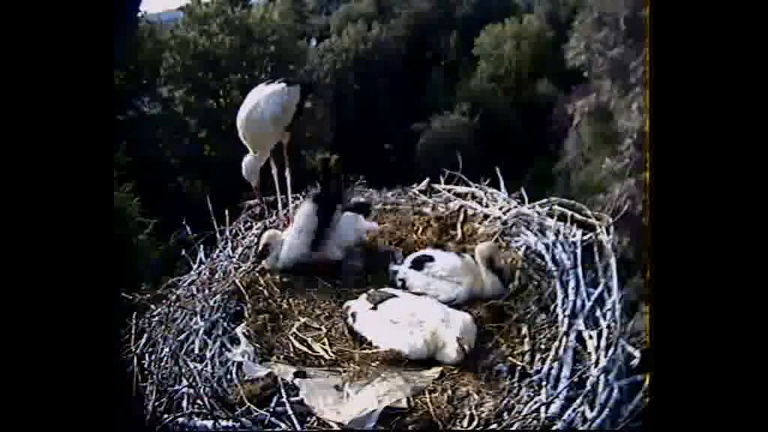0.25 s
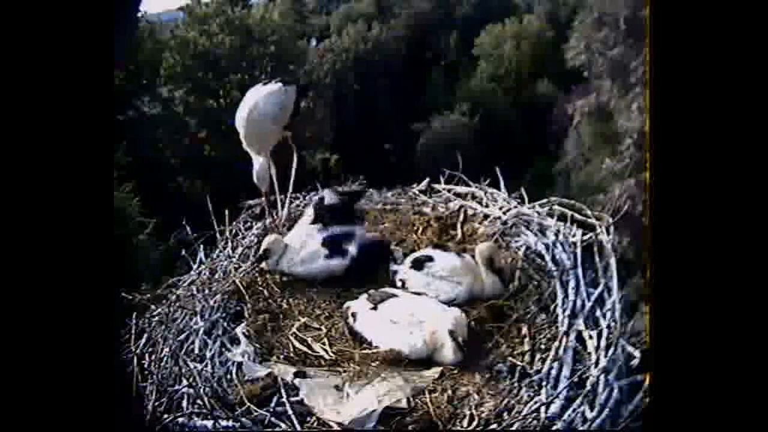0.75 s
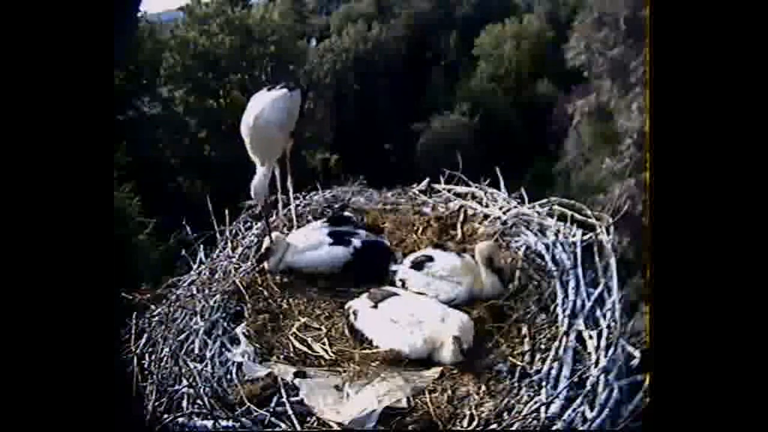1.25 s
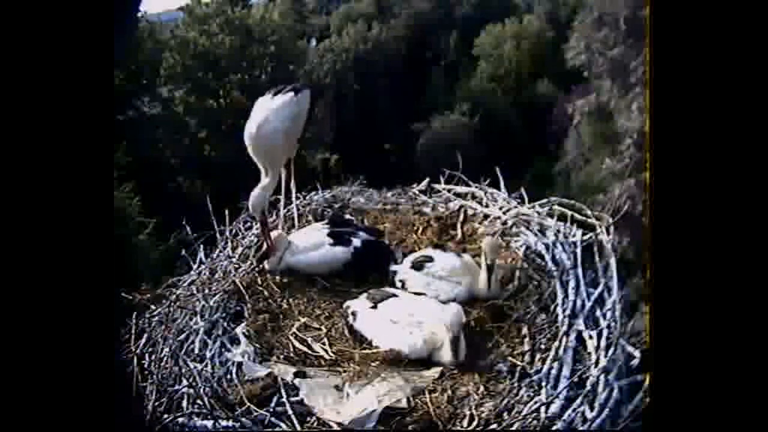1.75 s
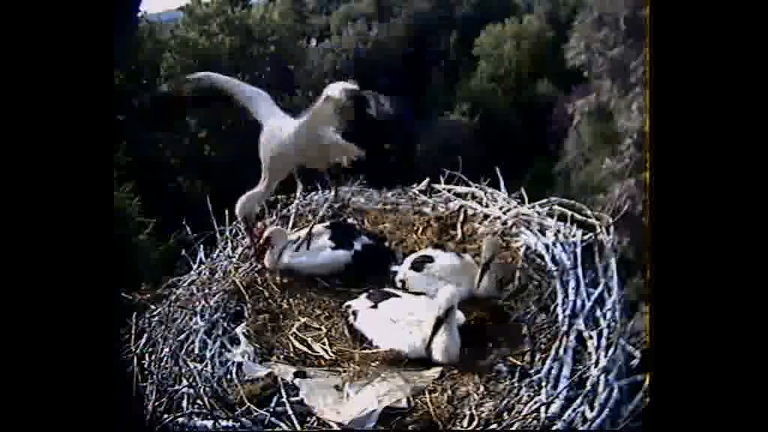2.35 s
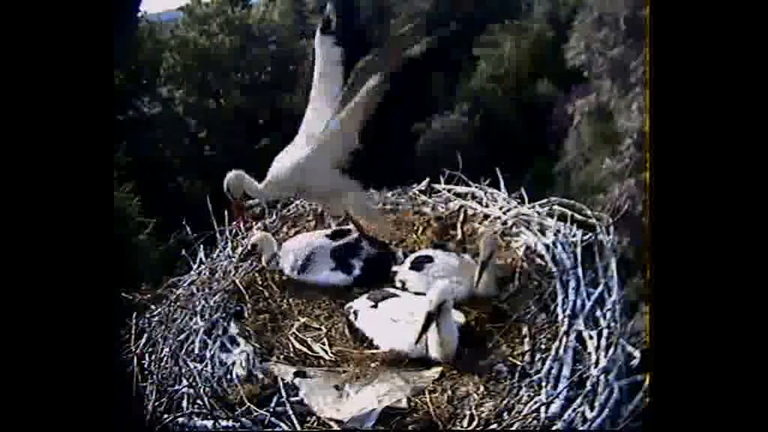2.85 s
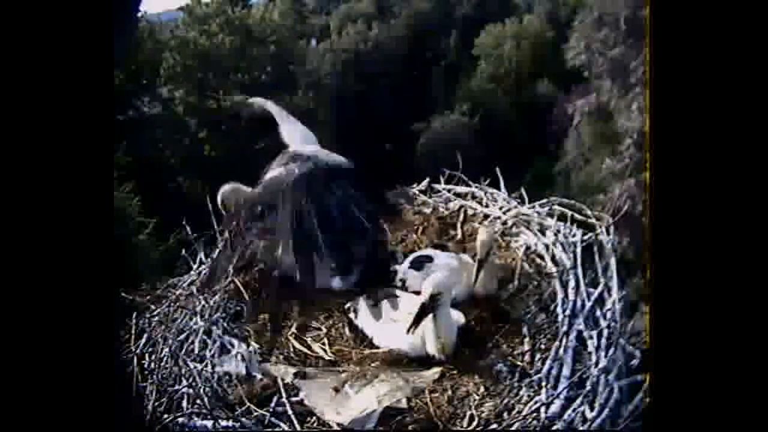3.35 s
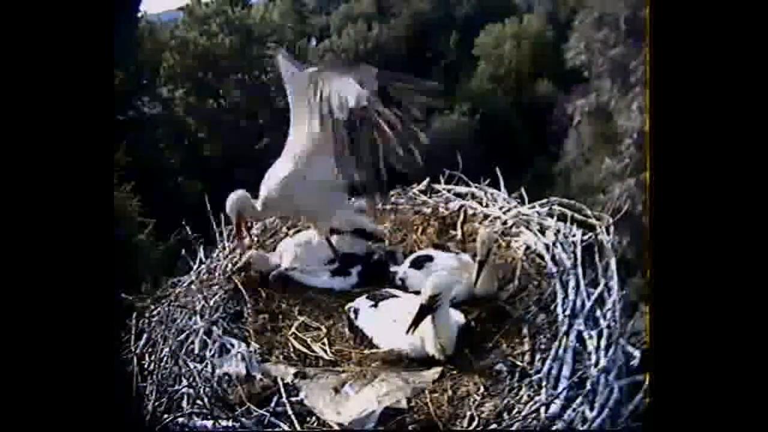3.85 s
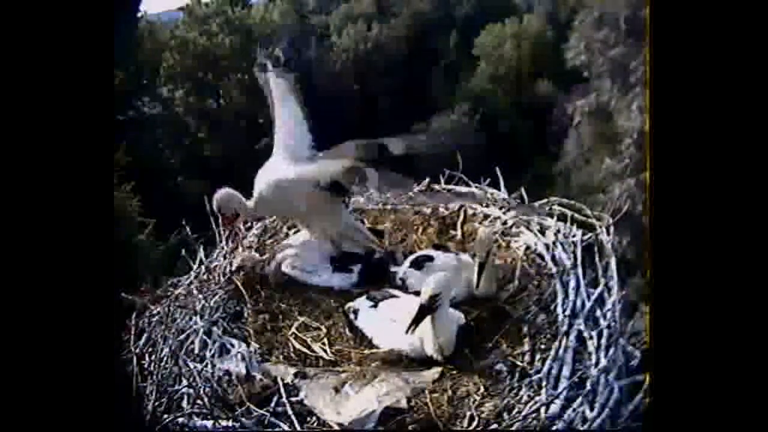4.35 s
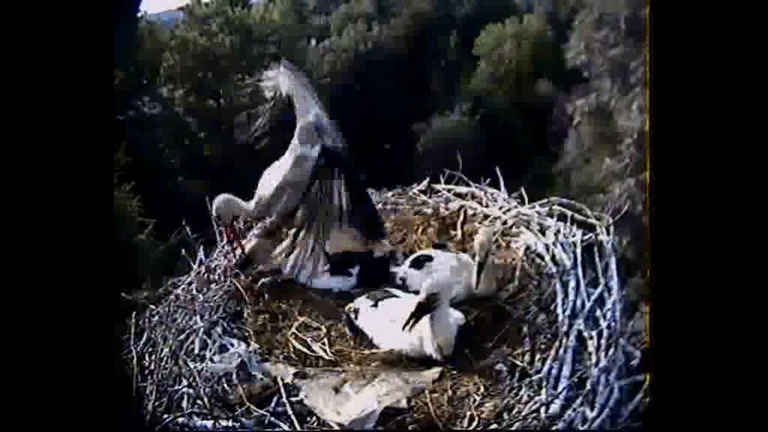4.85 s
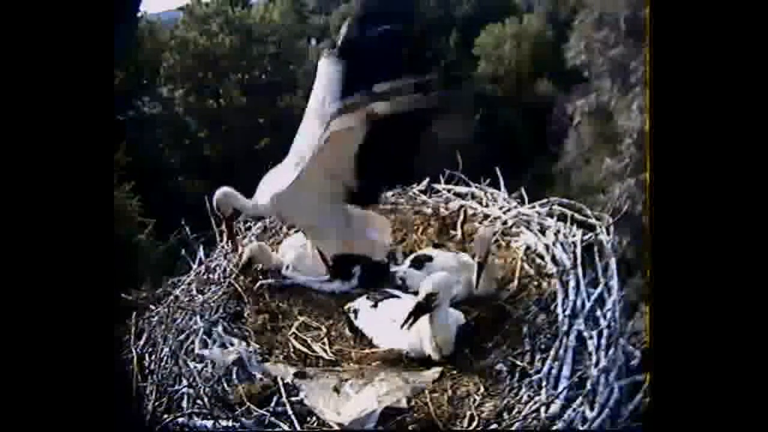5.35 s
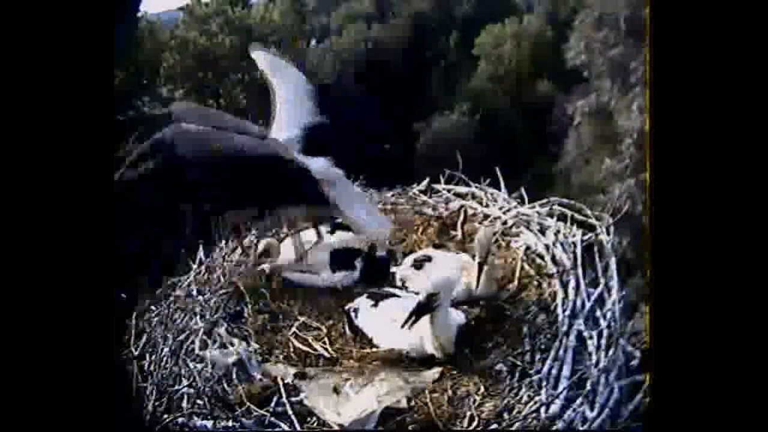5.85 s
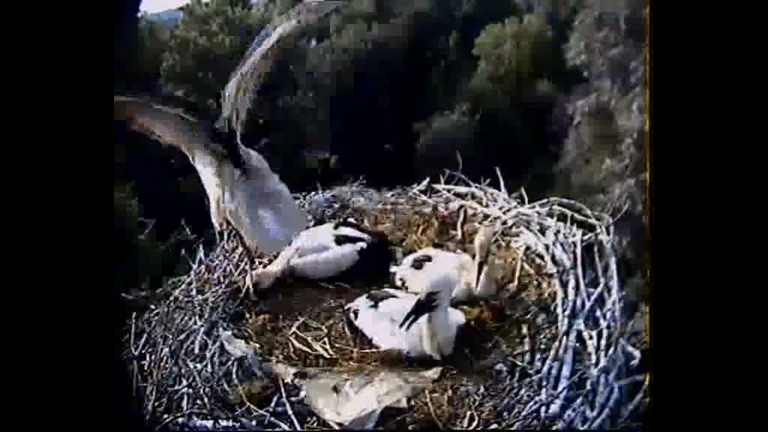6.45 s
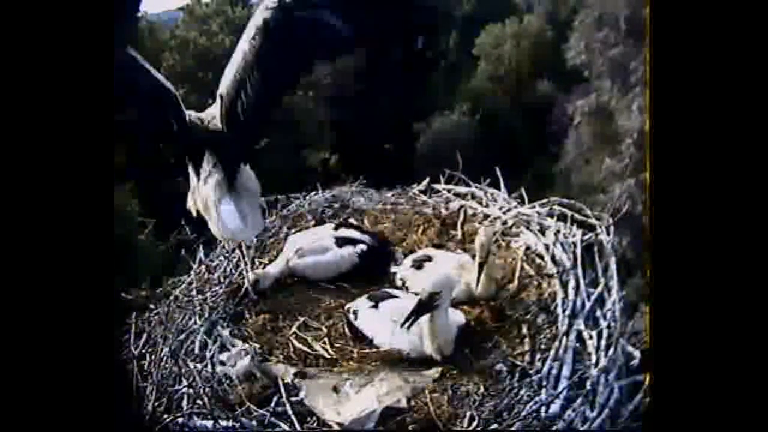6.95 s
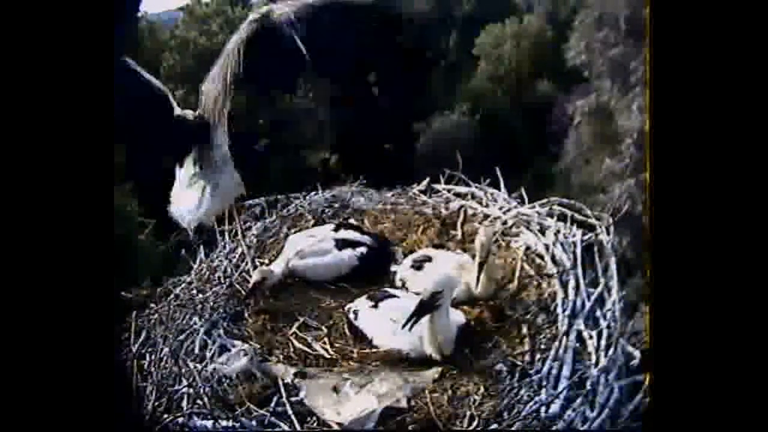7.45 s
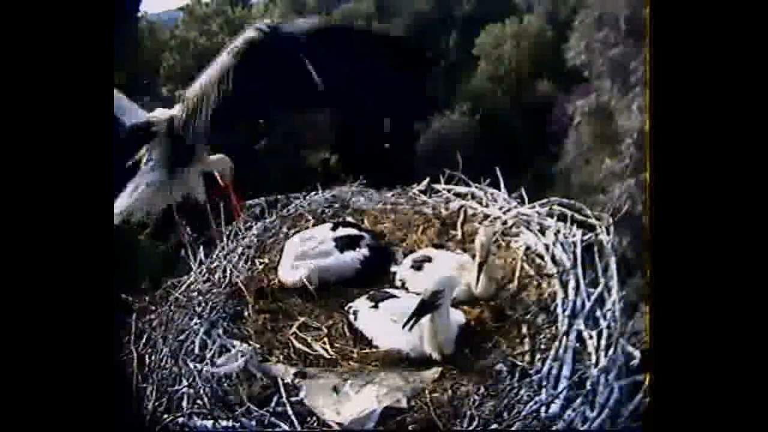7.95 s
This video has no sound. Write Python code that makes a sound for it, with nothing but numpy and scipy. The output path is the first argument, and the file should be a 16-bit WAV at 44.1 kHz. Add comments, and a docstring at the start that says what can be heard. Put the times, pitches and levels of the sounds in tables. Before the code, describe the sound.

Thin bird whistles give way to strong, rhythmic wing swishes with feather whistles and dry cracks, one very loud, above a low outdoor rumble.

```python
"""A young bird beats its wings in a nest among trees: noise arched in pitch swishes, feather tones whistle.
In the first seconds a stork chick whistles and mews, a gliding tone, among the first weak strokes.
Twigs snap and the wing cracks as short rings and noise bursts; straw ticks; soft puffs are shaped noise.
Shaped noise and a rough drone make distant traffic, wind and leaves; a narrow-band nest camera hears all."""
import sys
import numpy as np
from scipy import signal
from scipy.fft import rfft, irfft, next_fast_len
from scipy.io import wavfile
from scipy.ndimage import uniform_filter1d, map_coordinates

SR = 44100
rng = np.random.default_rng(int(sys.argv[2]) if len(sys.argv) > 2 else 0)


def dump_mix(stems):
    """Bounce the given channels to the path in sys.argv[1] as a 16-bit WAV at rate SR."""
    frames = np.atleast_2d(stems).T  # one column per channel
    limited = np.clip(frames, -1, 1)  # hard clip at full scale
    pcm = np.round(limited * 32767).astype(np.int16)
    wavfile.write(sys.argv[1], SR, pcm)


N = 361619
T = np.arange(N) / SR  # s


def amp(db):
    """Decibels to a linear factor."""
    return 10 ** (np.asarray(db) / 20)


def unit(x):
    """x scaled to rms 1."""
    return x / np.sqrt(np.mean(np.abs(x) ** 2) + 1e-20)


def along(points, hz):
    """(Hz, value) points read on a log frequency axis."""
    f, v = np.transpose(points)
    return np.interp(np.log(hz + 1), np.log(f + 1), v)


def curves(rows, t=T):
    """Each column after the first, interpolated at t."""
    s, *cols = np.transpose(rows)
    return [np.interp(t, s, c) for c in cols]


def around(start, end):
    """The samples from start to end, with a 20 ms margin."""
    return slice(round((start - .02) * SR), round((end + .02) * SR))


def window(start, end, t, fade):
    """1 from start to end, with linear fades outside both."""
    return np.clip((t - start) / fade + 1, 0, 1) * np.clip((end - t) / fade + 1, 0, 1)


def wobble(rate, size=N):
    """A smooth random curve, rate knots a second."""
    knots = rng.standard_normal(int(size * rate / SR) + 4)
    return map_coordinates(knots, [np.arange(size) * rate / SR])


def smoothed(field, bins, frames):
    """A spectrogram-shaped field averaged over bins and frames."""
    return uniform_filter1d(uniform_filter1d(field, size=bins, axis=0), size=frames, axis=1)


def filtered(x, response):
    """x times a response of frequency."""
    m = next_fast_len(len(x) + 8192)
    return irfft(rfft(x, m) * response(np.fft.rfftfreq(m, 1 / SR)), m)[:len(x)]


def tone(pitch, rough, spread):
    """A phasor whose size and phase are partly scattered by noise."""
    rough = np.clip(rough, 0, 1)
    scatter = wobble(spread, size=len(pitch)) + 1j * wobble(spread, size=len(pitch))
    carrier = np.exp(2j * np.pi * np.cumsum(pitch) / SR)
    return carrier * (np.sqrt(1 - rough) + np.sqrt(rough / 2) * scatter)


def hump(hz, centre, sharp):
    """A resonance round a centre, its mean power over the bins set to 1."""
    shape = 1 / (1 + (sharp * (hz / centre - centre / hz)) ** 2)
    return shape / np.sqrt(np.mean(shape ** 2, axis=0))


def rush(spectrum, patchy_db):
    """Coloured noise of rms 1 with patches of random gain."""
    z = signal.stft(rng.standard_normal(N), nperseg=512)[2]
    patches = unit(smoothed(rng.standard_normal(z.shape), bins=8, frames=8))
    noise = signal.istft(z * amp(patchy_db * patches), nperseg=512)[1][:N]
    return unit(filtered(noise, lambda hz: amp(along(spectrum, hz))))


# Spectrum of leaves and straw. Each row: frequency in Hz, relative density in dB.
RUSTLE_SPECTRUM = [(1290, -7.5), (2200, -8), (3300, -2), (3850, -3.5), (5570, -4), (7600, -6), (9750, -7),
                   (12700, 5.5), (21400, -120)]


def crackle(rate):
    """Faint dry ticks of straw: random impulses, rate a second, sizes widely spread."""
    hits = rng.random(N) < rate / SR
    sizes = amp(7 * rng.exponential(size=N).clip(0, 3))
    ticks = hits * sizes * rng.choice([-1, 1], N)
    return filtered(ticks, lambda hz: amp(along(RUSTLE_SPECTRUM, hz)))


# Background course. Each row: time in seconds, rumble level in dB, hum level in dB, rustle level in dB.
AIR_LEVELS = [(0, -56, -54.5, -62.5), (.48, -56, -54.5, -57.5), (1, -55.5, -54, -62),
              (2, -53, -53.5, -59.5), (2.69, -56, -52.5, -54.5), (4.06, -50.5, -54, -56),
              (4.68, -53, -50.5, -53.5), (5.21, -50, -52.5, -56), (5.96, -46.5, -50, -51),
              (6.69, -54, -51, -60.5), (8.2, -53, -52.5, -59.5)]
# Far engine. Each row: time in seconds, pitch in Hz, level in dB.
ENGINE_DRONE = [(0, 102, -61), (1.2, 102, -58), (4.3, 98, -53), (5.1, 90, -61), (5.3, 70, -58),
                (6.8, 68, -50), (8.2, 67, -58)]
# Far rumble. Each row: frequency in Hz, relative density in dB.
RUMBLE_SPECTRUM = [(8.8, -54), (15, -7.5), (59, 3), (200, -21.5), (260, -65), (440, -120)]
# Hum of traffic and wind. Each row: frequency in Hz, relative density in dB.
HUM_SPECTRUM = [(76, -13), (130, 4.5), (172, -1), (238, 2), (328, -2.5), (452, -3), (568, -6.5), (884, -5),
                (1170, -5), (1320, -7.5), (1820, -10), (2510, -16), (3200, -25), (4160, -62), (7040, -120)]


def air():
    """Far rumble and hum as shaped noise, a rough engine drone; leaves and straw rustle above them."""
    rumble_db, hum_db, rustle_db = curves(AIR_LEVELS)
    drone_hz, drone_db = curves(ENGINE_DRONE)
    rumble = amp(rumble_db) * rush(RUMBLE_SPECTRUM, patchy_db=0.0)
    drone = amp(drone_db) * tone(drone_hz, 0.7, spread=16).real
    hum = amp(hum_db) * rush(HUM_SPECTRUM, patchy_db=.6)
    leaves = rush(RUSTLE_SPECTRUM, patchy_db=.5) + 1.6 * crackle(rate=50)
    return rumble + drone + hum + amp(rustle_db + 0.55 * wobble(14)) * leaves


# Twig snaps, and cracks of the wing as a stroke starts. Each row: start in seconds, level in dB,
# pitch in Hz, then thud and crack in dB re that level.
SNAP_EVENTS = [(0.0622, -38.5, 1720, -1, -34), (0.2785, -47, 2920, -16, -20), (2.3324, -29, 3470, -23, -20),
               (2.5158, -20.5, 3230, -25, -45), (2.9017, -22.5, 4250, -34, -41),
               (3.0608, -29.5, 2460, -25, -4.5), (3.1768, -22, 1570, -37, -12),
               (3.2696, -24.5, 2250, -33, -36), (3.296, -39, 1920, -27, -2), (3.6144, -31, 1430, -31, -14),
               (3.7053, -32, 1560, -18, -9), (4.1434, -36, 3660, 3.5, -21), (4.4634, -16, 2130, -47, -26),
               (4.508, -31, 3380, -12, -16), (4.8427, -25, 2840, -31, -26), (5.22, -31.5, 1520, -26, -4),
               (5.8885, -20, 1500, -20, -25), (5.8914, -8, 3030, -10.5, -9), (8.093, -26.5, 1880, -12, -30)]
# Thin straw ticks. Each row: start in seconds, level in dB, pitch in Hz.
STRAW_TICKS = [(0.5205, -40.5, 4040), (0.5694, -38.5, 4500), (4.12, -41, 6240), (4.351, -41, 5800),
               (7.4195, -47, 7800), (7.596, -44.5, 8610), (7.6315, -43, 7100), (7.7794, -42, 7100),
               (7.873, -46, 7710), (7.9468, -47.5, 7750), (8.0366, -50.5, 4410)]


def snaps_and_ticks():
    """Twig snaps and wing cracks: a brief ring, a noise burst, a low thud, a bright crack; ticks are noise."""
    out, t = np.zeros(N + SR), np.arange(SR // 20) / SR
    for s, db, hz, thud_db, crack_db in SNAP_EVENTS:
        noise = rng.standard_normal((2, len(t)))
        ring = -amp(-60 * t / .0035) * np.sin(2 * np.pi * hz * t)
        burst = filtered(noise[0], lambda f: (f > 600) / (1 + (f / 4000) ** 2))
        burst = .5 * amp(-60 * t / .018) * burst
        thud = -(np.sin(2 * np.pi * 430 * t) + 0.39 * np.sin(2 * np.pi * 760 * t))
        thud = amp(thud_db - 60 * t / 0.014) * thud
        crack = amp(crack_db - 60 * t / 0.0088) * filtered(noise[1], lambda f: f > 4800)
        out[round(s * SR):][:len(t)] += amp(db) * (ring + burst + thud + crack)
    for s, db, hz in STRAW_TICKS:
        tick = filtered(rng.standard_normal(len(t)), lambda f: hump(f + 1, hz, sharp=1.7))
        out[round(s * SR):][:len(t)] += amp(db - 60 * t / 0.0092) * tick
    return out[:N]


# Chick calls, one list per call. Each row: time in seconds, pitch in Hz, level in dB.
CHICK_CALLS = [
    [(0.065, 1750, -54), (0.1, 2040, -46), (0.135, 3480, -63), (0.155, 3130, -56), (0.2, 2870, -61),
     (0.25, 2980, -49), (0.28, 2920, -45.5), (0.315, 2670, -51), (0.35, 2410, -52), (0.43, 2230, -45),
     (0.462, 2445, -64), (0.5, 2083, -40), (0.55, 1852, -53), (0.585, 2090, -41.5), (0.62, 1866, -48),
     (0.655, 1707, -55), (0.675, 1842, -51), (0.705, 1758, -49.5), (0.745, 1618, -55)],
    [(1.5, 1695, -52.5), (1.522, 2150, -58), (1.532, 2640, -45), (1.58, 3200, -46), (1.62, 3354, -40),
     (1.65, 3213, -42), (1.662, 3010, -43), (1.7, 2810, -40.5), (1.75, 2752, -37.5), (1.785, 2520, -39.5),
     (1.802, 2210, -44), (1.85, 2320, -45.5), (1.885, 2460, -52.5), (1.945, 2020, -64)],
    [(1.955, 1924, -47), (2.0, 1888, -39.5), (2.03, 1910, -41.5), (2.055, 2155, -39.5), (2.085, 1874, -39),
     (2.2, 1860, -36.5), (2.3, 1826, -38), (2.33, 1740, -46)],
]
# Hoarse moments. Each row: start in seconds, end in seconds, added share of scatter (0-1).
HOARSE = [(.05, .165, .35), (.66, .76, 0.14), (1.805, 1.877, .6), (1.95, 2.34, 0.04)]
# Mewing moments. Each row: start in seconds, end in seconds, level in dB of the lines at thirds.
MEW_SPELLS = [(0.664, .735, -53), (1.955, 2.03, -53.5), (2.09, 2.35, -51.5)]
# Mew lines. Each row: multiple of a third of the pitch, level in dB re the mew level.
MEW_LINES = [(1, -3), (2, 0), (4, -5), (5, -9), (7, -15), (8, -20), (9, -17), (10, -23)]
# Voice overtone. Each row: pitch in Hz, overtone in dB re the voice.
VOICE_OVERTONE = [(1850, -35), (2100, -15.5), (2500, -20.5), (3300, -16)]
BREATHY_SHARE = .045  # scatter in a clear voice
MEW_FADE_S, HOARSE_FADE_S = 0.022, .02


def chick():
    """A near-pure whistle with one overtone; in the mews, lines appear at thirds of the pitch."""
    out = np.zeros(N)
    hoarse = BREATHY_SHARE + sum(share * window(a, b, T, HOARSE_FADE_S) for a, b, share in HOARSE)
    mewing = sum(amp(db) * window(a, b, T, MEW_FADE_S) ** 2 for a, b, db in MEW_SPELLS)
    for rows in CHICK_CALLS:
        start, end = rows[0][0], rows[-1][0]
        span = around(start, end)
        pitch, level_db = curves(rows, T[span])
        pitch = uniform_filter1d(pitch, size=300)
        pitch = pitch * (1 + 0.00627 * wobble(50.26, size=len(pitch)))
        rough = hoarse[span]
        overtone = amp(along(VOICE_OVERTONE, pitch)) * tone(2 * pitch, rough, spread=460)
        voice = tone(pitch, rough, spread=600) + overtone
        # higher lines are rougher
        mew = sum(amp(db) * tone(k * pitch / 3, .07 * k + .15, spread=250) for k, db in MEW_LINES)
        call = (amp(level_db) * voice + mewing[span] * mew).real
        out[span] += np.sqrt(2) * window(start, end, T[span], 0.011) * call
    return out


# Soft noise puffs: straw, feathers, wing puffs and the chick's hissing breath. Each row: start in seconds,
# length in seconds, centre in Hz, level in dB.
SOFT_PUFFS = [(0.365, 0.15, 7000, -58.5), (0.716, 0.1, 1955, -57), (1.101, 0.081, 517, -49.5),
              (1.64, 0.096, 550, -48.5), (1.785, 0.1, 5860, -60.5), (1.95, 0.67, 3000, -56),
              (2.326, 0.13, 2320, -50), (2.336, 0.39, 1070, -48), (4.034, 0.091, 6700, -54),
              (5.881, 0.054, 3060, -42), (6.056, 0.12, 5000, -55), (7.227, 0.09, 6500, -62),
              (7.585, 0.12, 7500, -60.5)]


def soft_puffs():
    """Straw, feathers, wing puffs and the chick's hissing breath: broad noise, fast swell and slow fade."""
    hz, t, z = signal.stft(rng.standard_normal(N), SR, nperseg=256)
    gain = np.zeros(z.shape)
    for s, length, centre_hz, db in SOFT_PUFFS:
        phase = np.clip((t - s) / length, 0, 1)
        swell = np.sin(np.pi * phase ** 0.47)  # early peak
        gain += amp(db) * hump(hz[:, None] + 1, centre_hz, sharp=0.98) * swell
    return signal.istft(z * gain, SR, nperseg=256)[1][:N]


# Wing strokes. Each row: start in seconds, length in seconds, top of the arch in Hz, then base levels
# of arch, closing puff and hiss in dB.
WING_STROKES = [(1.025, 0.11, 3300, -65, -62, -74), (1.568, 0.13, 2620, -63, -60, -68),
                (2.014, .13, 3070, -55, -53, -65), (2.826, .15, 3380, -57.5, -46, -54),
                (3.291, 0.12, 3520, -51.5, -45.5, -53), (3.702, 0.12, 3620, -51.5, -46.5, -53),
                (4.143, 0.11, 3660, -51, -48, -52.5), (4.508, .12, 3850, -48, -49.5, -54.5),
                (4.91, 0.13, 3650, -45.5, -45.5, -68), (5.27, 0.12, 3200, -40, -43, -50),
                (5.642, 0.14, 3200, -40, -45, -55), (5.93, 0.12, 3270, -39.5, -46.5, -41),
                (6.298, 0.113, 3767, -43.5, -47, -39), (8.089, 0.11, 3550, -47.5, -47, -47)]
# Course of a stroke. Each row: share of its length, air speed as share of the top, then arch, puff and
# hiss in dB re the base levels.
STROKE_COURSE = [(0, 0.28, 2, -13, -8), (.1, 0.71, -1.5, -7, -6), (.2, 0.93, 1, -7, 0),
                 (.45, 0.87, -3.5, -15, 2), (.62, 0.88, 1.5, -2, 4.5), (.72, .55, -7, 2, 2.5),
                 (.85, 0.36, -13, 1, -2), (1, 0.069, -15, -6, -19)]
# Feather resonances. Each row: centre in Hz, width in Hz, relative level in dB.
VANE_RESONANCES = [(513, 190, -1.5), (750, 90, 2), (1536, 410, -1), (2506, 410, -6), (3400, 190, -4),
                   (4010, 460, -4.5), (6670, 5600, -16.5), (7840, 1580, -2.5)]
# Hiss spectrum at top air speed. Each row: frequency in Hz, relative density in dB.
HISS_SPECTRUM = [(2710, -54), (4600, -0.5), (6480, 10.5), (7390, -3), (8150, 2.5), (9750, -5), (12700, -50),
                 (21400, -120)]


def swish():
    """Eddies off the wing: their pitch arches with air speed and wakes the feather resonances it passes."""
    hz, t, z = signal.stft(rng.standard_normal((3, N)), SR, nperseg=256)  # arch, puff, hiss
    hz, gain = hz[:, None] + 1, np.zeros(z.shape)
    vanes = unit(0.24 + sum(amp(db) / (1 + (2 * (hz - c) / w) ** 2) for c, w, db in VANE_RESONANCES))
    for s, length, top_hz, arch_db, puff_db, hiss_db in WING_STROKES:
        phase = (t - s) / length
        speed, arch, puff, fizz = curves(STROKE_COURSE, phase)
        layers = [amp(arch_db + arch) * hump(hz, top_hz * speed, sharp=1.7),
                  # broad inner feathers sound lower
                  amp(puff_db + puff) * hump(hz, 400 + .5 * top_hz * speed, sharp=0.57),
                  # the hiss brightens with speed
                  amp(hiss_db + fizz + along(HISS_SPECTRUM, hz / np.abs(speed) ** 0.26))]
        gain += np.array(layers) * vanes * ((phase > 0) & (phase < 1))
    # single vanes catch the air and let go
    streaks = unit(smoothed(rng.standard_normal(z.shape[1:]), bins=2, frames=8))
    gain *= amp(np.array([3.2, 3.2, 1.6])[:, None, None] * streaks)
    # the air tears unevenly: one random gain per layer and frame
    gain *= amp(1.5 * rng.standard_normal(gain.shape[::2])[:, None])
    return signal.istft(z * gain, SR, nperseg=256)[1][:, :N].sum(axis=0)


FLUTTER_DB = 1.7  # unsteadiness of a whistle


def whistle(pitch, level_db, rasp):
    """One unsteady tone with a weak overtone, rougher when weak."""
    pitch = pitch * (1 + 0.0087 * wobble(129.0, size=len(pitch)))
    level_db = level_db + FLUTTER_DB * wobble(73, size=len(pitch))
    rough = rasp - .018 * (level_db + 29)  # a strong whistle locks in and runs clean
    voice = tone(pitch, rough, spread=390) + amp(-18) * tone(2 * pitch, rough, spread=510)
    return np.sqrt(2) * amp(level_db) * voice.real


# Outer flight feathers, and at 2.04 and 2.34 s two clear chirps of another chick. Each row: start, crest
# and end in seconds, crest pitch in Hz, level in dB, swell from start to end in dB, depth of the arch as
# a share, added rasp (0-1).
ARCHED_WHISTLES = [(1.04, 1.074, 1.105, 3930, -55.5, 5, 1.7, 0),
                   (2.037, 2.052, 2.088, 3590, -37.5, 2, .75, 0),
                   (2.336, 2.347, 2.386, 3480, -37, 6, .5, 0),
                   (2.841, 2.872, 2.93, 3960, -50, -14, 0.57, 0.24),
                   (2.896, 2.899, 2.98, 4016, -36, -3, 1.8, 0.35),
                   (3.303, 3.344, 3.378, 4024, -39, 9, .9, 0), (3.715, 3.755, 3.772, 3800, -47.5, 3, .3, 0),
                   (3.725, 3.755, 3.775, 4500, -46.5, 5, 1.1, 0.1),
                   (4.15, 4.186, 4.215, 3744, -35.5, 8, 0.28, 0),
                   (4.152, 4.185, 4.2, 4470, -38.5, 5, 1.05, 0.3),
                   (4.513, 4.553, 4.588, 4040, -32.5, 1, 1.2, 0.44),
                   (4.918, 4.959, 5.003, 4050, -37.5, 6, 0.52, 0.57),
                   (4.971, 4.966, 5, 4700, -42, -1, 0.54, .3),
                   (5.281, 5.317, 5.36, 4080, -41, -24, 1.3, 0.5),
                   (5.652, 5.675, 5.76, 3420, -41.5, -6, .15, 0.4),
                   (5.664, 5.69, 5.72, 4250, -48.5, 4, 0.63, 0.4),
                   (5.947, 5.982, 6.012, 4030, -31, 1, 1.08, 0),
                   (6.31, 6.345, 6.378, 4050, -29, -2, .65, .08), (8.11, 8.138, 8.46, 4150, -37, 4, 1.4, 0)]
# Broad inner feather. Each row: start in seconds, end in seconds, level in dB.
INNER_WHISTLES = [(2.83, 2.86, -49.5), (2.891, 2.924, -46.5), (3.305, 3.387, -51), (3.78, 3.793, -44),
                  (5.285, 5.35, -49), (5.655, 5.732, -48), (5.96, 6.025, -45)]
# parabolic pitch bend before and after the crest, at depth 1
RISE_BEND_HZ_PER_S2, FALL_BEND_HZ_PER_S2 = 450000, 850000
INNER_START_HZ, INNER_RISE_HZ_PER_S, INNER_RASP = 2460, 1520, .3
WEAKER_DB_PER_KHZ, WHISTLE_FADE_S = 8.5, .006  # weaker below the crest pitch


def feathers_and_chirps():
    """Air shed from a feather's edge whistles, its pitch arched with stroke speed; two chirps arch alike."""
    out = np.zeros(N)
    for start, crest, end, top_hz, db, swell_db, depth, rasp in ARCHED_WHISTLES:
        span = around(start, end)
        t = T[span]
        bend = np.where(t < crest, RISE_BEND_HZ_PER_S2, FALL_BEND_HZ_PER_S2) * depth
        sag_hz = np.minimum(bend * (t - crest) ** 2, top_hz / 2)
        swell = swell_db * ((t - start) / (end - start) - .5)
        level_db = db - WEAKER_DB_PER_KHZ * sag_hz / 1000 + swell
        out[span] += window(start, end, t, WHISTLE_FADE_S) * whistle(top_hz - sag_hz, level_db, rasp)
    for start, end, db in INNER_WHISTLES:
        span = around(start, end)
        t = T[span]
        pitch = INNER_START_HZ + INNER_RISE_HZ_PER_S * (t - start)
        out[span] += window(start, end, t, WHISTLE_FADE_S) * whistle(pitch, db, INNER_RASP)
    return out


TREES_T60_S = 0.069


def trees(x):
    """A short diffuse answer from the branches around: a decaying noise tail, 200 samples late."""
    t = T[:SR // 3]
    tail = rng.standard_normal(len(t)) * amp(-60 * t / TREES_T60_S)
    return signal.fftconvolve(x, np.pad(tail, (200, 0)) / np.linalg.norm(tail))[:N]


def scene():
    """The nest's sounds, their scatter from the trees, and the air behind."""
    nest = chick() + feathers_and_chirps() + swish() + soft_puffs() + snaps_and_ticks()
    return (nest + amp(-17.5) * trees(nest) + air())[None]


# Camera response. Each row: frequency in Hz, gain in dB.
MIC_RESPONSE = [(7000, -1), (9000, -1.5), (9900, -4.5), (10100, -19.5), (11800, -37), (12200, -28),
                (14000, -32)]
TOP_HZ = 14100  # no scene sound passes above


def record(dry):
    """The camera rolls off steeply above its band and adds a thin electronic whine."""
    sound = filtered(dry[0], lambda hz: amp(along(MIC_RESPONSE, hz)) * (hz < TOP_HZ))
    whine = amp(-82) * np.sin(2 * np.pi * SR / 4 * T)
    return (sound + whine)[None]


dry = scene()
out = record(dry)
dump_mix(out)
```